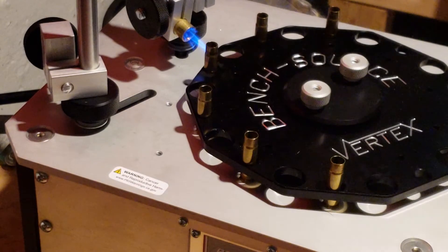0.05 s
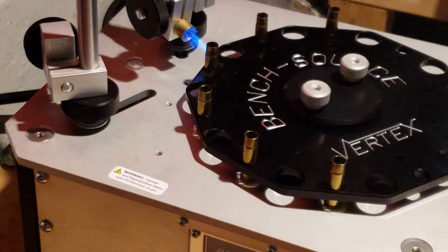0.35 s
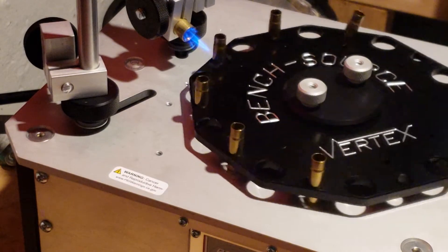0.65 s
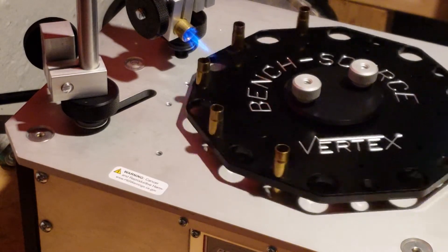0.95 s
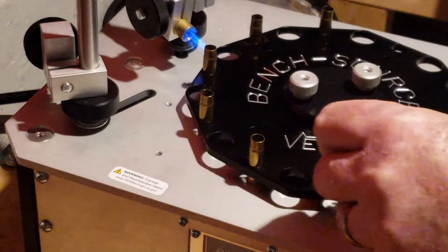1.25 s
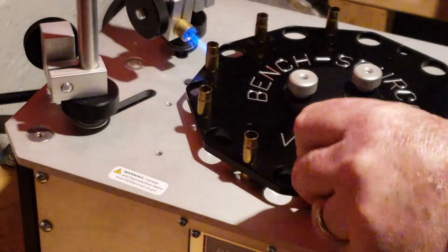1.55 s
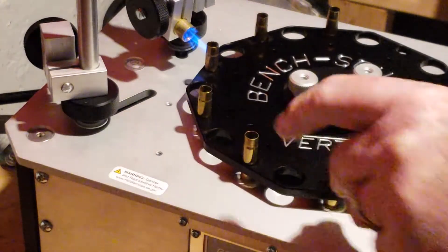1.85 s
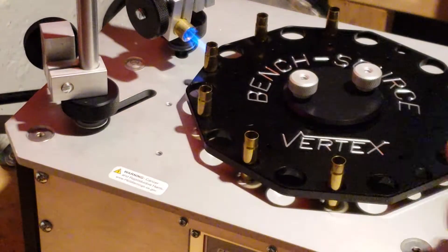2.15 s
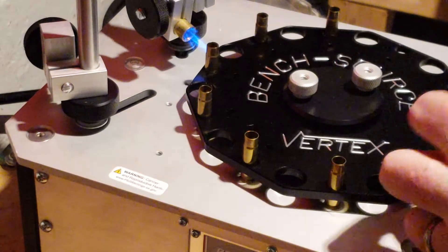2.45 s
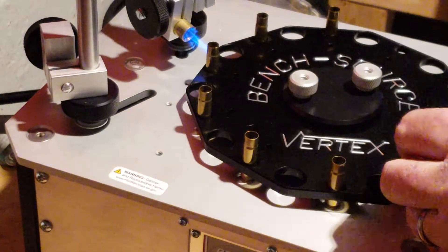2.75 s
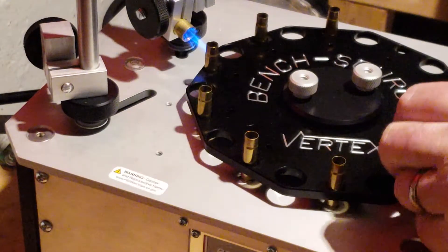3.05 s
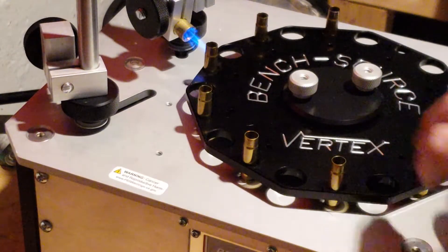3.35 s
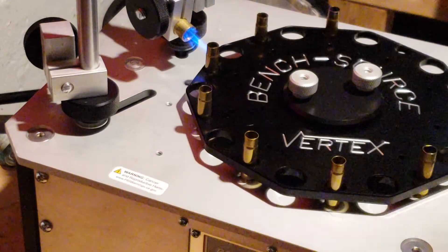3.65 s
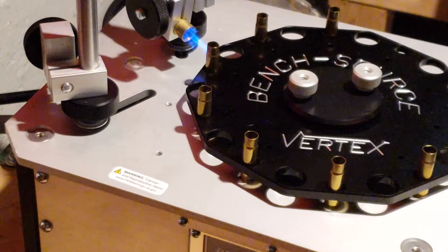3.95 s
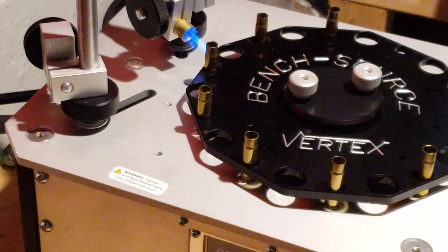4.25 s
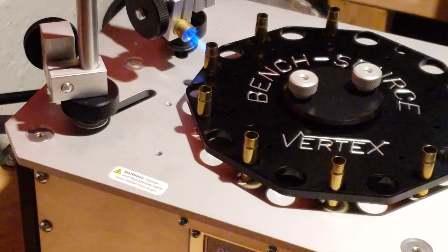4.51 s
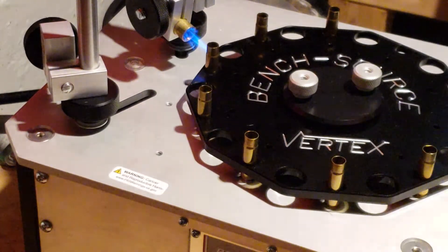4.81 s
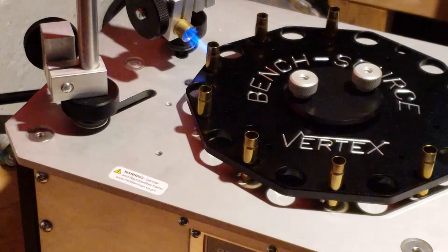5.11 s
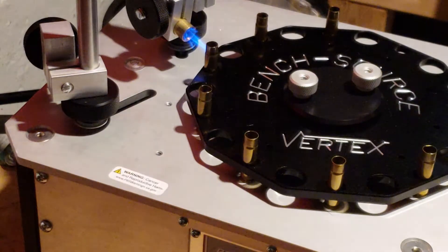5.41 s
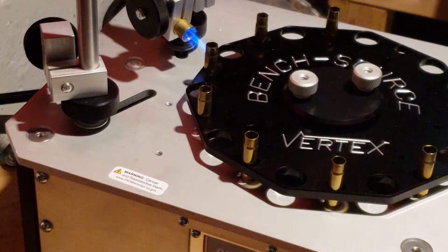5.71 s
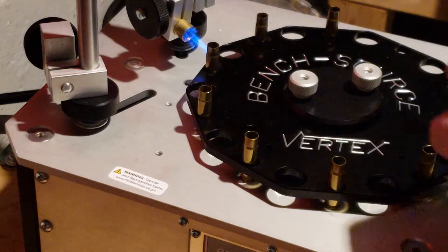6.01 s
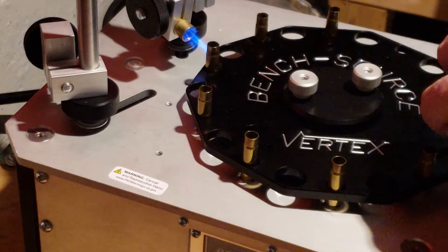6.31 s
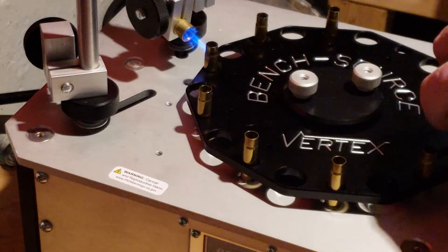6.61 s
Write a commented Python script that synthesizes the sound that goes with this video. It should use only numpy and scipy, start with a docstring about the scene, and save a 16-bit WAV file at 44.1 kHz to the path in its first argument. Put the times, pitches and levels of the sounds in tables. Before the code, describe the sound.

A gas torch hisses softly and a machine hums throughout in a small workshop. The machine's wheel scrapes round, small brass cases jingling in it, and stops with a loud metallic clatter. Cases clink, and one drops into its hole with a bouncing clack; another follows a little later. A hand rummages with soft rustles and dull bumps, and after a pause a few light clinks come near the end.

```python
"""A small workshop, where a gas torch hisses and a case annealer hums throughout. The annealer moves one
station on: its wheel slides round with stick-slip friction and stops with a clatter that excites the modes
of the metal deck, while the brass cases jingle in their holes, each mouth ringing like a small bell.
A hand drops in a fresh case, rummages for another and brings it up with a few clinks."""
import sys
import numpy as np
from scipy import signal
from scipy.fft import rfft, irfft
from scipy.io import wavfile

SR = 44100
rng = np.random.default_rng(int(sys.argv[2]) if len(sys.argv) > 2 else 0)


def wrap_up_sound(samples):
    """Save the sound to the file named by the first command line argument, as 16-bit audio."""
    columns = np.atleast_2d(samples).T
    # keep every value between -1 and 1, then stretch to whole-number steps
    tamed = np.clip(columns, -1, 1)
    steps = np.round(tamed * 32767).astype(np.int16)
    wavfile.write(sys.argv[1], SR, steps)


N = 298557
TIME = np.arange(N) / SR
AGE = TIME[:SR * 4 // 5]  # time since an impact [s]
BAND_EDGE_HZ = 7550


def amp(db):
    """Amplitude ratio of a level in decibels."""
    return 10 ** (np.asarray(db) / 20)


def unit(x):
    """Normalisation to rms 1."""
    return x / np.sqrt(np.mean(x ** 2) + 1e-20)


def read(points, hz):
    """Interpolation of a table on a logarithmic frequency axis."""
    f, value = np.transpose(points)
    return np.interp(np.log(hz + 1), np.log(f + 1), value)


def tilt(hz, slope_db):
    """Spectral tilt: brightness as slope_db per octave about 2 kHz."""
    return slope_db * np.log2(np.clip(hz, 300, 8000) / 2000)


def colour(x, spectrum, slope_db=0, peaks=()):
    """Minimum-phase filtering keeps attacks sharp; white noise keeps its power, now within the band."""
    hz = abs(np.fft.fftfreq(len(x), 1 / SR))
    resonances_db = sum(db / (1 + (2 * (hz - centre) / width) ** 2) for centre, width, db in peaks)
    gain = amp(read(spectrum, hz) + tilt(hz, slope_db) + resonances_db)
    gain = gain / np.sqrt(np.mean(gain ** 2 * (hz < BAND_EDGE_HZ)))
    response = np.exp(np.conj(signal.hilbert(np.log(gain))))
    return irfft(rfft(x) * response[:len(x) // 2 + 1], len(x))


def drift(bandwidth_hz):
    """Low-pass noise: a smooth random fluctuation of rms 1."""
    hz = np.fft.rfftfreq(N, 1 / SR)
    return unit(irfft(rfft(rng.standard_normal(N)) * np.exp(-(hz / bandwidth_hz) ** 2), N))


def fade(t60):
    """Free exponential decay, 60 dB in t60 seconds."""
    return np.exp(-np.log(1000) * AGE / max(t60, 1e-3))


def mode(hz, db, t60):
    """A struck mode is a damped sinusoid, starting at db rms."""
    return np.sqrt(2) * amp(db) * fade(t60) * np.sin(2 * np.pi * hz * AGE)


def decay_by_band(x, t60s):
    """Frequency-dependent damping: each band of x decays at its own rate."""
    hz, spectrum = np.fft.rfftfreq(len(x), 1 / SR), rfft(x)
    centres, times = np.transpose(t60s)
    weights = [read(np.c_[centres, band], hz) for band in np.eye(len(times))]
    return sum(irfft(spectrum * weight, len(x)) * fade(t60) for weight, t60 in zip(weights, times))


def impact(spectrum, slope_db, crack_db, crack_t60, body_t60):
    """Impact noise: a sharp contact, then a crowd of damped modes."""
    envelope = amp(crack_db) * fade(crack_t60) + fade(body_t60)
    return colour(rng.standard_normal(len(AGE)) * envelope, spectrum, slope_db)


def friction(spectrum, force, slips_per_s, spread_db):
    """Stick-slip friction: many tiny slips of uneven size, scaled by the force."""
    slips = (rng.random(N) < slips_per_s / SR) * rng.choice([-1, 1], N)
    sizes = amp(spread_db * np.minimum(rng.exponential(1, N), 4))
    return colour(unit(slips * sizes), spectrum) * force


def resonant_noise(hz, width_hz):
    """A narrow resonance under random excitation, at rms 1."""
    detuning = (np.fft.rfftfreq(N, 1 / SR) - hz) / width_hz
    return unit(irfft(rfft(rng.standard_normal(N)) / (1 + (2 * detuning) ** 2), N))


def torch():
    """Broadband jet noise with thin whistles; interference with a near echo hollows its low range."""
    # spectrum of torch and workshop air (frequency [Hz], relative density [dB])
    spectrum = [(20, -16), (45, -6), (105, 2), (150, -9), (370, 0.5), (470, -3), (800, 2.5), (1200, 1),
                (1600, -1), (2200, -1), (2600, -12), (4400, -11.5), (6000, -16.5), (7400, -28)]
    # resonances in that noise (frequency [Hz], width [Hz], lift [dB])
    resonances = [(183.3, 43, 9.6), (402, 18, 5.8), (514, 9.3, 1.9), (745, 20, 9.8), (965, 6, 2),
                  (1101, 29, 7.9), (1308, 61, 4.4), (1916, 13, 11), (2984, 78, 5.5), (4060, 290, 6.6),
                  (4800, 91, 3.5)]
    # tones of the gas jet (frequency [Hz], wander [Hz], level [dB])
    whistles = [(3994, 7, -70.5), (6395, 16, -81)]
    flame_db, echo_s = -52.5, .00418
    gas = rng.standard_normal(N)
    dull = signal.sosfiltfilt(signal.butter(2, 2300, fs=SR, output="sos"), gas)
    gas = gas - 0.25 * np.interp(TIME - echo_s, TIME, dull)
    out = colour(gas, spectrum, peaks=resonances) * amp(flame_db + 0.3 * drift(13))
    for hz, wander_hz, db in whistles:
        cycles = np.cumsum(hz + wander_hz * drift(30)) / SR
        out += np.sqrt(2) * amp(db + 3.0 * drift(25)) * np.sin(2 * np.pi * cycles)
    return out


def machine_hum():
    """A line spectrum from motor and mains, with slight amplitude and phase modulation."""
    # steady tones (frequency [Hz], level [dB])
    tones = [(35, -71), (59.2, -67), (274.5, -65), (546, -67), (823.6, -71), (1098, -73.5)]
    out = np.zeros(N)
    for hz, db in tones:
        amplitude = np.sqrt(2) * amp(db + 0.97 * drift(2))
        out += amplitude * np.sin(2 * np.pi * hz * TIME + hz / 600 * drift(4.1))
    return out


def wheel_slide():
    """Sliding friction of cases on the deck grows with the wheel's speed and swells where one catches."""
    # scraping spectrum (frequency [Hz], relative density [dB])
    spectrum = [(150, -22), (370, -10), (520, -12), (1500, -9), (2200, 0), (2600, -11.5), (3100, -4),
                (4200, -15), (5400, -15.5), (7300, -33.5)]
    start_s, stop_s = 0.018, .93
    catch_s, catch_half_s, catch_db = 0.751, 0.024, 6.9
    speed = np.clip((TIME - start_s) / (stop_s - start_s), 0, 1) * (TIME < stop_s)
    catch = np.exp(-((TIME - catch_s) / catch_half_s) ** 2)
    force = speed ** 0.97 * amp(-46.5 + catch_db * catch)
    return friction(spectrum, force, slips_per_s=6000, spread_db=3.5)


def case_ring(pitch, lower_db, decay_factor):
    """Modal ringing of a brass mouth: the contact point weights the modes, touching the rim damps them."""
    # modes of a case mouth (base frequency [Hz], relative level [dB], base T60 [s])
    modes = [(2205, -12, .1), (3594, -3, .13), (3622, -13, .1), (5194, 2, .19), (5300, -13, .07),
             (7125, -23, .25)]
    return sum(mode(hz * pitch, db + lower_db * (hz < 4500), t60 * decay_factor) for hz, db, t60 in modes)


def case_clinks():
    """Impulsive excitation: a case ticks on the rim of its hole and rings, and another rings along."""
    # taps (time [s], level [dB], lift of lower modes [dB], decay time [factor], case [index])
    taps = [(.487, -46, 2.5, 1.57, 0), (.703, -40.5, -10, 0.4, 0), (.725, -56.5, 19.5, 1.54, 0),
            (.750, -50, 7, 1.54, 0), (1.423, -39.5, -0.5, 0.54, 0), (1.4587, -37, 1.5, 0.48, 0),
            (1.547, -49.5, -13, 0.33, 1), (1.734, -46.5, -3, .8, 0), (1.7394, -42, 5, 0.87, 0),
            (1.791, -33, 0.5, 0.93, 0), (1.953, -51, -3, 1.9, 1), (1.964, -51, -12, 1.3, 1),
            (2.0104, -57, 7, 1.04, 1), (3.0173, -49, 13, 1.3, 0), (3.0408, -39, 7.5, 0.78, 0),
            (3.265, -60, 5, 0.66, 0), (6.5079, -43, -3, 0.91, 1), (6.6678, -39, -3, 0.75, 1),
            (6.7025, -45, 0, 0.87, 1)]
    # two unlike cases (pitch [factor], tick against ring [dB], other case against ring [dB])
    cases = [(1, -3, -22), (1.024, 3, -7)]
    # tick of brass on the wheel (frequency [Hz], relative density [dB])
    tick_spectrum = [(60, -35), (380, 3.5), (520, -10.5), (1200, -6), (2150, 6.5), (2600, -7), (3100, -6),
                     (3650, 0), (4400, -9), (5250, -1.5), (5800, -6), (7300, -26.5)]
    rings, ticks = np.zeros(N), np.zeros(N)
    for s, tap_db, lower_db, decay_factor, which in taps:
        pitch, tick_db, other_db = cases[which]
        other_pitch = cases[1 - which][0]
        ring = case_ring(pitch, lower_db, decay_factor)
        ring += amp(other_db) * case_ring(other_pitch, lower_db, decay_factor)
        add(rings, s, amp(tap_db) * ring * (1 - fade(0.0068)))
        tick = impact(tick_spectrum, 0, crack_db=-7, crack_t60=0.0099, body_t60=.11)
        add(ticks, s, amp(tap_db + tick_db) * tick)
    shiver = amp(1.1 * drift(90))  # a loose case trembles as it rings
    return rings * shiver + ticks


def wheel_blows():
    """Plate vibration: the wheel hits stop and deck. Returns the dense clash and the longer modal ring."""
    # blows (time [s], level [dB], tilt [dB/octave], ring against clash [dB])
    blows = [(.9147, -20.5, -8, -20.5), (0.9175, -16, 4.5, -17.5), (.9265, -30, 0.5, -28.5),
             (.978, -23.5, -2, -10.5), (1.0954, -18, -2, -21), (1.174, -36, -4, -22),
             (1.204, -25, -1.5, -18.5)]
    # distinct modes of deck and wheel (frequency [Hz], relative level [dB], T60 [s])
    deck_modes = [(370, -8, .24), (586, -7, .26), (682, 1, .38), (759, -3, .7), (946, -5, .28),
                  (1051, -2, .4), (1159, 0, .42), (1505, -6, .24), (1589, -1, .38), (1767, 1, .44),
                  (1945, -11, .28), (2002, -6, .22), (2054, -8, .28), (2233, 1, .28), (2396, -5, .2),
                  (2522, -1, .27), (2810, -6, .19), (3167, 1, .29), (3284, -6, .22), (3714, -11, .25),
                  (4150, -5, .3), (4649, -5, .23), (4757, -4, .19), (4863, -1, .16), (5532, -8, .17),
                  (5750, -14, .34), (5864, -3, .2), (6335, -12, .2), (6772, -8, .13)]
    # their crowd of short-lived modes (frequency [Hz], relative density [dB])
    clash_spectrum = [(60, -37), (150, -33), (250, -19), (360, -8), (460, -17), (620, 2), (1100, -1),
                      (1400, 0), (2200, -3.5), (3200, -3), (3950, -5.5), (4700, -4.5), (6000, -6),
                      (7500, -21.5)]
    # damping of that crowd (frequency [Hz], T60 [s])
    clash_t60s = [(200, 0.22), (800, 0.099), (2000, 0.25), (4000, 0.19), (7500, 0.15)]
    rebound_s, rebound_db, rebound_tilt_db = .029, -12, 2.5
    peak_width_hz, ring_tilt_share = 65, 0.62
    # the clash is loudest at the strong modes of the deck
    peaks = [(hz, peak_width_hz, 4.5 * amp(db / 2)) for hz, db, _ in deck_modes]
    clash, ring = np.zeros(N), np.zeros(N)
    for s, blow_db, slope_db, ring_db in blows:
        rebound = (s + rebound_s, blow_db + rebound_db, slope_db + rebound_tilt_db)
        for at, clash_db, clash_slope_db in [(s, blow_db, slope_db), rebound]:
            crowd = decay_by_band(rng.standard_normal(len(AGE)), clash_t60s)
            crowd *= 1 + amp(-1.5) * fade(0.012)  # the crack of contact
            add(clash, at, amp(clash_db) * colour(crowd, clash_spectrum, clash_slope_db, peaks))
        # each blow lands on another spot and favours other modes
        signs = rng.choice([-1, 1], len(deck_modes))
        shares = signs * amp(3.5 * rng.uniform(-1.8, 1, len(deck_modes)))
        modes = sum(share * mode(hz, db + tilt(hz, ring_tilt_share * slope_db), t60)
                    for share, (hz, db, t60) in zip(shares, deck_modes))
        add(ring, s, amp(blow_db + ring_db) * modes)
    bass_cut = signal.butter(2, 260, "high", fs=SR, output="sos")  # the ring carries little bass
    return clash, signal.sosfilt(bass_cut, ring)


def case_drops():
    """Inelastic collision: a case's solid base clacks on the deck, which thuds, and bounces to rest."""
    # landings (time [s], level [dB], tilt [dB/octave], lift of the thud [dB],
    # delay of first bounce [s], later bounce spacing [s], loss per bounce [dB])
    landings = [(1.766, -23.5, 2, 1, 0.045, 0.014, 2), (3.2841, -25, 5.5, 5, 0.022, .022, 13)]
    # clack of the base (frequency [Hz], relative density [dB])
    clack_spectrum = [(100, -41), (300, -3), (400, 4), (520, -12), (1200, -2), (2050, 3), (2550, -6),
                      (3000, 8), (3800, -3.5), (4500, -7), (5500, -3), (6200, -5.5), (7400, -18)]
    # deck modes under the case (frequency [Hz], relative level [dB], T60 [s])
    seat_modes = [(405, -15, .2), (2815, -16, .1), (3072, -18, .1), (3190, -16, .14), (5563, -16, .12)]
    bounce_db, bounce_tilt_db, thud_below_hz = -11, -2.5, 1000
    out = np.zeros(N)
    for start, db, slope_db, thud_db, first_s, gap_s, loss_db in landings:
        bounces = [(start + first_s + k * gap_s, db + bounce_db - k * loss_db, slope_db + bounce_tilt_db)
                   for k in range(3)]
        for s, hit_db, hit_slope_db in [(start, db, slope_db)] + bounces:
            clack = impact(clack_spectrum, hit_slope_db, crack_db=-22, crack_t60=0.018, body_t60=0.11)
            add(out, s, amp(hit_db) * clack)
        ring = sum(mode(hz, mode_db + thud_db * (hz < thud_below_hz), t60)
                   for hz, mode_db, t60 in seat_modes)
        add(out, start, amp(db - 5) * ring * (1 - fade(0.061)))
    return out


def rim_rub():
    """Friction drives one mode of a case's mouth as it slides down the rim of its hole, until it lands."""
    start_s, stop_s = 3.1, 3.284
    swell = np.sqrt(np.clip((TIME - start_s) / (stop_s - start_s), 0, 1)) * (TIME < stop_s)
    return amp(-65) * resonant_noise(hz=3600, width_hz=25) * swell


def stroke_force(start, length, db):
    """The force envelope of one hand stroke: linear attack, hold, exponential release."""
    attack_s, release_t60 = 0.0063, 0.46
    attack = np.clip((TIME - start) / attack_s, 0, 1)
    released_s = np.maximum(TIME - start - length, 0)
    return amp(db) * attack * np.exp(-np.log(1000) * released_s / release_t60)


def rummaging_hand():
    """Friction under the fingers rustles and squeaks once; damped impacts give a few dull bumps."""
    # strokes (time [s], length [s], relative level [dB])
    strokes = [(3.95, 0.086, -43), (4.068, 0.13, -46), (4.263, 0.032, -52), (4.36, 0.094, -52.5),
               (4.516, 0.035, -48.5), (4.68, .06, -51)]
    # rustling (frequency [Hz], relative density [dB])
    rustle_spectrum = [(80, -23), (190, 2.5), (260, -4), (410, -1.5), (540, -6.5), (740, 5), (1100, -3),
                       (1600, -2.5), (2200, -6.5), (3000, -10.5), (5800, -8.5), (7400, -25.5)]
    # bumps among the things handled (time [s], relative level [dB], tilt [dB/octave])
    bumps = [(4.0218, -38, 4.5), (4.147, -42, 3), (4.187, -39, -0.5), (4.382, -38.5, -1.5),
             (4.6294, -45.5, .5), (4.684, -34, -3.5), (4.7182, -44, 5)]
    # one dull bump (frequency [Hz], relative density [dB])
    bump_spectrum = [(80, -32), (190, -4.5), (270, -12), (420, 2), (540, -6), (760, 7.5), (1100, 2.5),
                     (1600, -8), (2200, -2), (3000, -9), (5800, -10.5), (7400, -28)]
    squeak_s, squeak_half_s = 4.402, .014
    force = np.max([stroke_force(*row) for row in strokes], axis=0)
    out = friction(rustle_spectrum, force, slips_per_s=1700, spread_db=2.0)
    for s, db, slope_db in bumps:
        bump = impact(bump_spectrum, slope_db, crack_db=-10.5, crack_t60=0.024, body_t60=0.13)
        add(out, s, amp(db) * bump)
    squeak = resonant_noise(hz=6330, width_hz=450) * np.exp(-((TIME - squeak_s) / squeak_half_s) ** 2)
    return out + amp(-49.5) * squeak


def workshop_echo(x, t60s):
    """Reverberation: convolution with sparse reflections of random sign from the bench and near walls."""
    reflections_per_s, first_s = 3000, .003
    signs = rng.choice([-1, 1], len(AGE))
    arrivals = (rng.random(len(AGE)) < reflections_per_s / SR) * (AGE > first_s)
    tail = decay_by_band(signs * arrivals, t60s)
    return signal.fftconvolve(x, tail / np.linalg.norm(tail))[:N]


def add(mix, s, sound):
    """Superposition of a sound on the mix at s seconds."""
    part = mix[round(s * SR):][:len(sound)]
    part += sound[:len(part)]


def scene():
    """Direct sound and reverberation of the moving parts add to the steady torch and hum."""
    clash, ring = wheel_blows()
    clinks = case_clinks() + rim_rub()
    drops = case_drops()
    rubbing = wheel_slide() + rummaging_hand()
    direct = clash + ring + clinks + drops + amp(-1.5) * rubbing
    to_room = (amp(-10.5) * clash + amp(-17) * ring + amp(-13) * clinks
               + amp(-8.5) * drops + amp(-11.5) * rubbing)
    echo = workshop_echo(to_room, [(300, 0.35), (2000, 0.14), (7000, 0.15)])  # (frequency [Hz], T60 [s])
    return (direct + echo + torch() + machine_hum())[None]


def record(dry):
    """Band limiting: a narrow-band microphone channel acts as a steep low-pass filter."""
    low_pass = signal.firwin(171, BAND_EDGE_HZ, window=("kaiser", 8), fs=SR)
    return signal.oaconvolve(dry, low_pass[None], "same")


dry = scene()
out = record(dry)
wrap_up_sound(out)
```